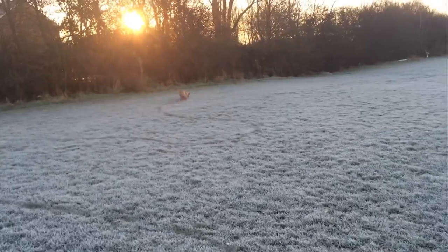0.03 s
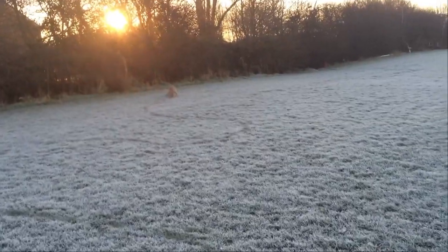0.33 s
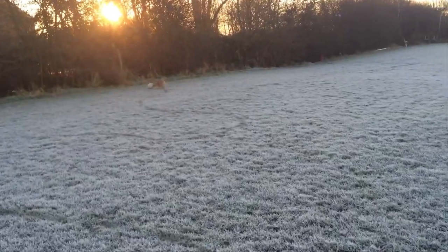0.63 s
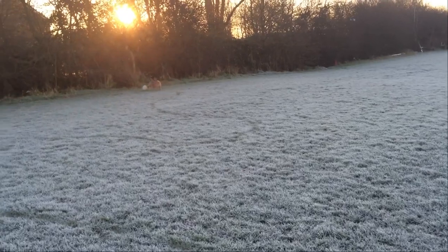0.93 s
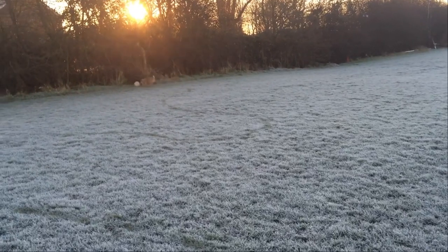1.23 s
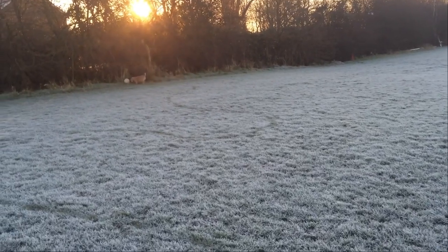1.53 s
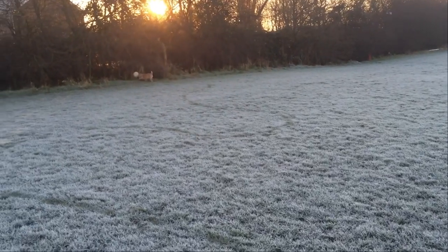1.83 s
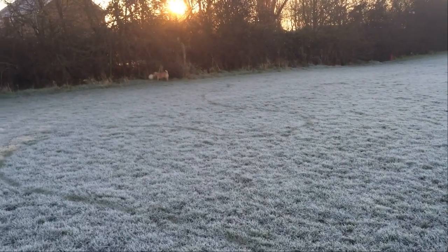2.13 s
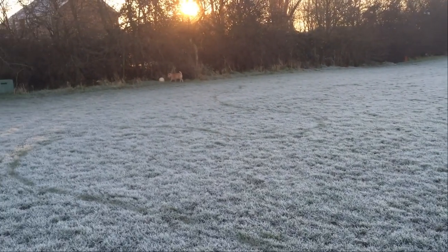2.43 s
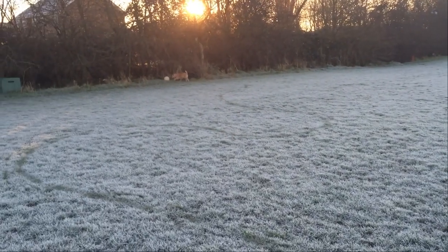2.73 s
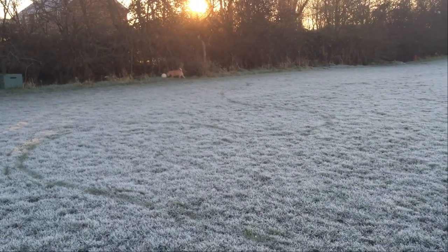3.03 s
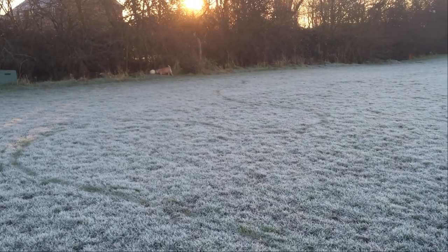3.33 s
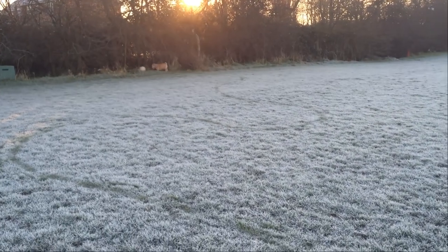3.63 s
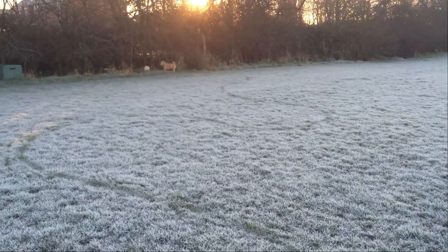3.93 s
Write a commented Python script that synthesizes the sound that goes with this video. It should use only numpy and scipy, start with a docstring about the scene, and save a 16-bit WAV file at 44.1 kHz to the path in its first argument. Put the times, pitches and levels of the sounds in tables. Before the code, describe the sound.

Soft, unhurried steps crush frosty turf in a quiet field, each with a fine icy crackle. A breeze buffets the microphone with low rumble, and faint birds chirp, then give two gliding whistles with a slight echo.

```python
"""Slow footsteps crunch across a frozen field at sunrise.
Each sole knocks on hard ground, crushes turf and sheds fizzing frost; a few stalks snap.
A breeze buffets the microphone with rumble and soft thumps. Small birds chirp and whistle
in the hedge, and the trees answer with a soft echo over the far hush of the countryside."""
import sys
import numpy as np
from scipy import signal
from scipy.fft import rfft, irfft, next_fast_len
from scipy.io import wavfile
from scipy.ndimage import uniform_filter1d

SR = 44100
rng = np.random.default_rng(int(sys.argv[2]) if len(sys.argv) > 2 else 0)


def wav_record(signal):
    """Record a signal, one row per channel, as 16-bit PCM in the file named by sys.argv[1]."""
    frames = np.transpose(np.atleast_2d(signal))
    bounded = np.clip(frames, -1, 1)
    # unit amplitude maps onto the largest positive 16-bit level
    quanta = np.round(bounded * 32767).astype(np.int16)
    wavfile.write(sys.argv[1], SR, quanta)


N = 176400
TIME = np.arange(N) / SR


def amp(db):
    """Decibels to gain."""
    return 10 ** (np.asarray(db) / 20)


def unit(x):
    """Scales to rms 1."""
    return x / np.sqrt(np.mean(x ** 2) + 1e-20)


def add(mix, start, sound):
    """Lays a sound into the mix at a time in seconds."""
    part = mix[max(round(start * SR), 0):][:len(sound)]
    part += sound[:len(part)]


def colour(x, curve):
    """Shapes a signal with an EQ curve, at rms 1."""
    hz, db = np.transpose(curve)
    f = np.fft.rfftfreq(len(x), 1 / SR)
    gain = amp(np.interp(np.log(f + 1), np.log(hz), db))
    return unit(irfft(rfft(x) * gain, len(x)))


def resonate(x, hz, q):
    """One broad resonance, at rms 1."""
    f = np.fft.rfftfreq(len(x), 1 / SR) + 1
    return unit(irfft(rfft(x) / (1 + 1j * q * (f / hz - hz / f)), len(x)))


def drift(size, hz):
    """Smooth random modulation, up to about hz."""
    n = next_fast_len(max(size, 8192))
    f = np.fft.rfftfreq(n, 1 / SR)
    return unit(irfft(rfft(rng.standard_normal(n)) * np.exp(-(f / hz) ** 2), n))[:size]


# Tone of the ambience bed: (frequency [Hz], relative level [dB])
HUSH_EQ = [(20, -0.5), (200, 11), (500, 1.5), (1050, 3), (1500, -1.5), (2400, -9.5), (4000, -13),
           (8000, -16.5), (15000, -19)]

def hush(level_db=-59.5):
    """Far countryside air: a bed of noise that barely breathes."""
    return amp(level_db) * colour(rng.standard_normal(N), HUSH_EQ) * amp(0.39 * drift(N, hz=6.6))


# Tone of the wind rumble: (frequency [Hz], relative level [dB])
RUMBLE_EQ = [(15, -66), (30, -10), (55, 1), (80, 2.5), (120, -4), (180, -12.5), (280, -26.5), (450, -43.5),
             (1000, -65), (16000, -100)]
# Fader ride of the gusts: (time [s], level [dB])
GUSTS = [(0, -45), (.1, -33.5), (.3, -35), (.65, -34.5), (.9, -43.5), (1.1, -37), (1.2, -39.5), (1.45, -40),
         (1.85, -35.5), (2.17, -37.5), (2.45, -35.5), (2.59, -47.5), (2.66, -32.5), (3.03, -34),
         (3.15, -38.5), (3.36, -52), (3.48, -34.5), (4, -33.5)]

def breeze(trim_db=-2):
    """Lumpy low turbulence on the microphone, swelling with each gust."""
    rumble = colour(rng.standard_normal(N), RUMBLE_EQ)
    gust_db = np.interp(TIME, *np.transpose(GUSTS))
    return rumble * amp(gust_db + 2 * drift(N, hz=17) + trim_db)


# Wind thumps: (time [s], peak level [dB], pitch [Hz])
EDDY_THUMPS = [(0.051, -26, 84), (0.202, -20.5, 70.4), (.211, -34, 248), (.514, -34.5, 213),
               (0.709, -28, 61), (0.737, -23.5, 108), (0.754, -24.5, 150), (0.91, -32.5, 230),
               (0.945, -32, 172), (1.239, -30, 175), (1.97, -21.5, 77.4), (1.977, -27.5, 170),
               (2.082, -18, 64.6), (2.106, -23.5, 210), (2.166, -20.5, 134), (2.2, -23, 84.6),
               (2.262, -21.5, 83), (2.34, -28.5, 78.6), (2.82, -30, 112), (2.056, -24.5, 98),
               (0.444, -29.5, 73.6), (0.583, -26.5, 111), (2.647, -28.5, 210), (2.657, -22.5, 111),
               (2.695, -24.5, 120), (2.734, -30, 176), (2.771, -26, 73), (2.891, -26.5, 161),
               (2.905, -31.5, 188), (2.954, -28.5, 126), (3.014, -30.5, 134), (3.052, -22, 66.4),
               (3.071, -26.5, 142), (3.629, -23, 203), (3.668, -20, 91), (3.807, -18, 69.4),
               (3.816, -29, 142), (3.827, -30.5, 242), (3.851, -20, 80)]
# Tone of the flutter around each thump: (frequency [Hz], relative level [dB])
WAKE_EQ = [(60, -39), (140, 9.5), (200, 2.5), (280, -5), (400, -8), (550, -21), (900, -34), (16000, -100)]

def eddies(width_cycles=0.43, wake_db=-15.5, wake_s=0.013):
    """Single eddies thump the microphone, each inside a wake of smaller ones."""
    thumps, wake = np.zeros(N), np.zeros(N)
    t = np.arange(-SR // 20, SR // 20) / SR
    for middle, db, hz in EDDY_THUMPS:
        pulse = np.cos(2 * np.pi * hz * t) / np.cosh(hz * t / width_cycles) ** 2
        add(thumps, middle + t[0], amp(db) * pulse)
        add(wake, middle + t[0], amp(db + wake_db) * hz / 160 * np.exp(-(t / wake_s) ** 2))
    return thumps + wake * colour(rng.standard_normal(N), WAKE_EQ)


def tree_echo(x, t60_s=1.4, top_hz=5200):
    """Scattered reflections from trunks and hedge, dulled by the air."""
    t = TIME[:SR]
    taps = rng.standard_normal(SR) * (rng.random(SR) < 900 / SR)
    taps *= amp(-60 * t / t60_s) * np.minimum(t / 0.0025, 1)
    dull = signal.sosfilt(signal.butter(2, top_hz, fs=SR, output="sos"), x)
    return signal.fftconvolve(dull, taps / np.linalg.norm(taps))[:N]


def twig_smear(x, decay_s=0.025, wet_db=-2):
    """Branches close around the birds smear every note with quick reflections."""
    t = TIME[:SR // 4]
    taps = rng.standard_normal(len(t)) * (rng.random(len(t)) < 1500 / SR) * np.exp(-t / decay_s)
    return x + amp(wet_db) * signal.fftconvolve(x, taps / np.linalg.norm(taps))[:N]


def sing(hz, gain, waver, flutter_db=4):
    """A near-pure bird tone that wavers in pitch and flutters in level."""
    turns = np.cumsum(hz * (1 + waver * drift(len(hz), hz=199))) / SR
    flutter = amp(flutter_db * drift(len(hz), hz=89))
    return np.sqrt(2) * gain * flutter * np.sin(2 * np.pi * turns)


# Bird notes: (start [s], length [s], foot pitch [Hz], top pitch [Hz], level [dB])
CHIRP_NOTES = [(0.023, 0.035, 3400, 4370, -62.5), (0.623, .025, 10900, 10950, -71),
               (1.136, 0.054, 8600, 8440, -73), (0.944, 0.065, 3670, 5750, -61.5),
               (1.036, .04, 3850, 5380, -65), (1.287, 0.052, 3520, 5250, -62),
               (1.322, 0.037, 3160, 3750, -67), (1.359, 0.056, 3090, 4450, -59.5),
               (1.372, 0.041, 4000, 5480, -65.5), (1.398, 0.027, 2780, 3600, -57.5),
               (1.429, .03, 3290, 3500, -54.5), (1.452, 0.063, 3620, 5370, -68),
               (1.472, .044, 2610, 2750, -62), (1.484, 0.03, 3130, 3840, -64),
               (1.532, 0.019, 3240, 3470, -56), (1.541, 0.037, 3720, 5200, -66),
               (1.549, 0.0606, 2680, 2830, -65), (1.563, 0.081, 3400, 3637, -55),
               (1.578, 0.058, 3658, 4010, -53), (1.629, 0.09, 2890, 3300, -63.5),
               (1.652, .062, 2535, 2577, -58.5), (1.656, .08, 3500, 3964, -67),
               (1.752, .09, 3500, 3840, -63.5), (1.831, 0.072, 2493, 2650, -66.5),
               (1.848, 0.068, 3550, 3860, -66), (2.858, 0.068, 3660, 5430, -61.5),
               (2.874, 0.096, 2610, 3020, -68), (2.944, .05, 3276, 3790, -58),
               (2.965, .056, 3770, 4880, -63), (2.983, 0.15, 2675, 3240, -66.5),
               (3.105, .12, 3675, 3710, -65.5), (3.418, 0.055, 3400, 5550, -64),
               (3.51, 0.034, 3460, 5330, -62.5), (3.572, .2, 8030, 8150, -77.5),
               (3.945, 0.12, 7130, 8000, -72)]

def chirps(fall_hz=200, fade_db=-3):
    """Small birds sing short arched notes, sinking and fading as they go."""
    out = np.zeros(N)
    for start, length, foot_hz, top_hz, db in CHIRP_NOTES:
        along = np.linspace(-1, 1, int(length * SR))
        arch = 1 - along ** 2
        bend = arch + 0.04 * drift(len(arch), hz=80.4)
        pitch = foot_hz + (top_hz - foot_hz) * bend - fall_hz * along / 2
        gain = amp(db + fade_db * along / 2) * np.minimum(arch * 3, 1)
        add(out, start, sing(pitch, gain, waver=0.016))
    return out


# Contours of a thin high whistle and a lower, louder one: (time [s], pitch [Hz], level [dB])
HIGH_WHISTLE = [(2.071, 7190, -74), (2.081, 7290, -54.5), (2.099, 7750, -63.5), (2.165, 7660, -57.5),
                (2.192, 7700, -56), (2.234, 7830, -59.5), (2.321, 7860, -58.5), (2.398, 7730, -63),
                (2.521, 8000, -64), (2.528, 7900, -64)]
LOW_WHISTLE = [(2.61, 3800, -71), (2.616, 3750, -44), (2.677, 3692, -51.5), (2.691, 3555, -56),
               (2.729, 3708, -61.5), (2.778, 3586, -60), (2.81, 3540, -63), (2.9, 3500, -70)]

def whistles(trill_hz=85, trill_depth=0.003):
    """Two long gliding bird whistles, each carrying a fast trill."""
    out = np.zeros(N)
    for contour in HIGH_WHISTLE, LOW_WHISTLE:
        times, hz, db = np.transpose(contour)
        t = np.arange(times[0], times[-1], 1 / SR)
        trill = 1 + trill_depth * np.sin(2 * np.pi * trill_hz * t)
        pitch = np.interp(t, times, hz) * trill
        add(out, times[0], sing(pitch, amp(np.interp(t, times, db)), waver=0.0042))
    return out


def impacts(hits, tick_db, tick_cycles, decay_s, q):
    """Contact or breakage: a damped pulse for the attack, a dying burst of debris for the tail."""
    out, t = np.zeros(N), TIME[:2048]
    for start, db, hz in hits:
        tick = np.sin(2 * np.pi * hz * t) * np.exp(-t * hz / tick_cycles)
        add(out, start, amp(db + tick_db) * tick[:512])
        debris = resonate(resonate(rng.standard_normal(len(t)), hz, q), hz, q)
        add(out, start, amp(db) * debris * np.exp(-t / decay_s) * np.minimum(t * hz, 1))
    return out


# Stalk hits: (time [s], level [dB], pitch [Hz])
STALK_SNAPS = [(.896, -40, 3970), (1.176, -44, 2370), (1.182, -44, 2190), (1.206, -46, 4500),
               (2.62, -36, 2370), (3.629, -57, 4320)]

def snaps():
    """Frozen stalks break with a short, bright crack."""
    return impacts(STALK_SNAPS, tick_db=-3, tick_cycles=1.5, decay_s=0.0027, q=1.0)


# Sole hits: (time [s], level [dB], pitch [Hz])
SOLE_KNOCKS = [(.252, -49.5, 450), (.267, -51, 606), (.636, -43.5, 464), (.636, -47.5, 980),
               (.828, -48, 670), (.846, -44.5, 670), (.894, -46.5, 570), (1.268, -51, 764),
               (2.103, -44, 485), (2.163, -52, 415), (2.882, -44, 397), (3.607, -43, 330)]

def knocks():
    """A sole meets hard ground with a dull knock."""
    return impacts(SOLE_KNOCKS, tick_db=1.5, tick_cycles=0.86, decay_s=0.0088, q=1.67)


def breaking_blades(grains_per_s=3200, ring_cycles=2.14, swish=0.92, clump_db=1.5):
    """Countless icy blades break in clumps, each with a brief ring, over a soft swish."""
    grains, t = np.zeros(N), TIME[:512]
    pitches = np.geomspace(600, 14000, num=20)
    for hz in pitches:
        share = np.sqrt(hz) / np.sqrt(pitches).sum()
        clicks = rng.choice([-1., 1.], N) * (rng.random(N) < share * grains_per_s / SR)
        clicks *= amp(0.5 * np.minimum(rng.exponential(1, N), 3))
        ring = np.sin(2 * np.pi * hz * t) * np.exp(-t * hz / ring_cycles)
        grains += np.sqrt(hz) * unit(signal.oaconvolve(clicks, ring)[:N])
    return (unit(grains) + swish * rng.standard_normal(N)) * amp(clump_db * drift(N, hz=131))


def patchy(x, depth_db=2, width_hz=700, length_s=0.012):
    """Each clump of blades has its own pitch: brief resonances come and go."""
    spectra = signal.stft(x, nperseg=256, noverlap=192)[2]
    patches = uniform_filter1d(rng.standard_normal(spectra.shape), round(width_hz * 256 / SR), axis=0)
    patches = uniform_filter1d(patches, round(length_s * SR / 64), axis=1)
    spectra *= amp(depth_db * unit(patches))
    return unit(signal.istft(spectra, nperseg=256, noverlap=192)[1][:N])


# Tone of the frost fizz: (frequency [Hz], relative level [dB])
FROST_EQ = [(500, -44), (2000, 6), (3500, 4), (6000, 2), (8500, 0.5), (11000, -3), (15000, 1)]
# Frozen grass giving way underfoot:
# (middle [s], half length [s], turf level [dB], turf pitch [Hz], frost level [dB], frost pitch [Hz])
FOOT_PRESSES = [(0.141, 0.018, -63, 1550, -88, 5000), (0.444, 0.033, -53.5, 795, -90.5, 8000),
                (0.445, 0.02, -60, 2850, -85, 3500), (0.483, 0.11, -57, 830, -68, 7650),
                (0.725, 0.023, -54.5, 1210, -63, 7800), (.745, .02, -70, 3400, -51.5, 6400),
                (0.816, 0.15, -60.5, 1010, -67, 6500), (1.11, 0.017, -53, 1630, -58, 10100),
                (1.225, 0.013, -49, 1300, -58.5, 4300), (1.228, 0.014, -56.5, 2500, -59, 7000),
                (1.271, 0.024, -55, 900, -55, 6350), (1.566, 0.12, -70, 2510, -71, 7100),
                (1.663, .048, -83, 2400, -67.5, 7800), (1.925, 0.0098, -54.5, 1890, -71, 4300),
                (2.09, 0.08, -60, 1990, -83, 4960), (2.124, 0.013, -50.5, 2650, -59, 5100),
                (2.145, 0.011, -52.5, 2080, -66, 3800), (2.177, 0.02, -54, 3540, -62, 8400),
                (2.626, 0.0063, -47.5, 1400, -63, 8000), (2.673, .023, -62.5, 2130, -77, 5000),
                (2.962, 0.011, -84, 2500, -63, 7450), (3.152, 0.046, -68.5, 2180, -64.5, 8500),
                (3.249, 0.02, -59.5, 1950, -71, 6000), (3.46, 0.074, -69, 3170, -65, 7040),
                (3.605, 0.075, -68.5, 3100, -66, 8500)]

def crunches():
    """Each press of a foot swells and fades: crushed turf for body, shed frost for sparkle."""
    out = np.zeros(N)
    turf = patchy(breaking_blades())
    frost = colour(patchy(breaking_blades()), FROST_EQ)
    for middle, half, turf_db, turf_hz, frost_db, frost_hz in FOOT_PRESSES:
        press = np.exp(-0.5 * (abs(TIME - middle) / half) ** 1.95)
        body = amp(turf_db) * resonate(turf, turf_hz, q=2.05)
        fizz = amp(frost_db) * resonate(frost, frost_hz, q=1.95)
        out += press * np.roll(body + fizz, rng.integers(N))  # fresh grains for each press
    return out


def scene():
    """Mono mix: birds, hush and wind around the footsteps, with only the birds sent to the echo."""
    song = twig_smear(chirps() + whistles()) * amp(-1.5)
    bed = hush()
    footsteps = snaps() + knocks() + crunches()
    wind = breeze() + eddies()
    return (bed + wind + song + amp(-6) * tree_echo(song) + footsteps)[None]


def record(dry, low_cut_hz=35.3, high_cut_hz=15400):
    """The microphone sheds the deepest bass; a steep high cut trims the very top."""
    lean = signal.sosfiltfilt(signal.butter(2, low_cut_hz, "high", fs=SR, output="sos"), dry)
    high_cut = signal.firwin(511, high_cut_hz, window=("kaiser", 9), fs=SR)
    return signal.oaconvolve(lean, high_cut[None], "same")


dry = scene()
out = record(dry)
wav_record(out)
```